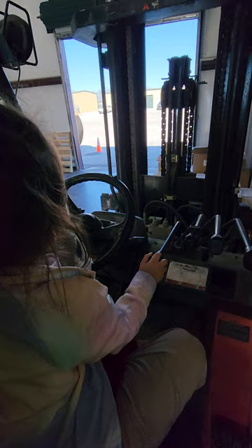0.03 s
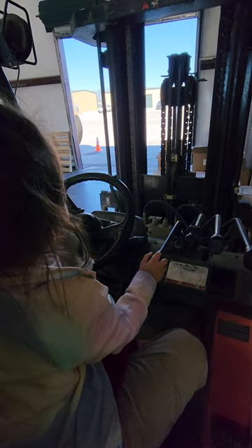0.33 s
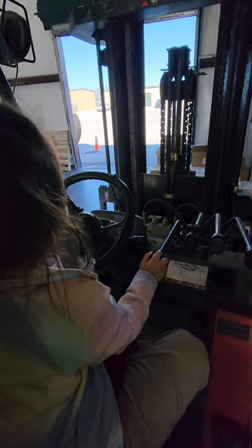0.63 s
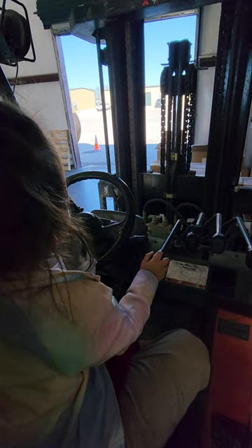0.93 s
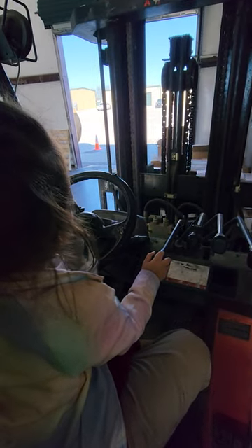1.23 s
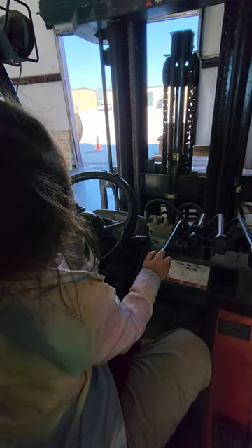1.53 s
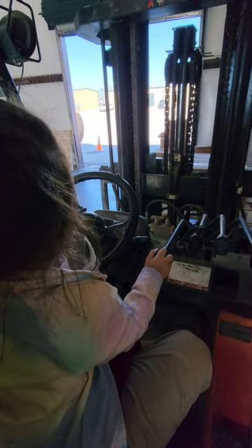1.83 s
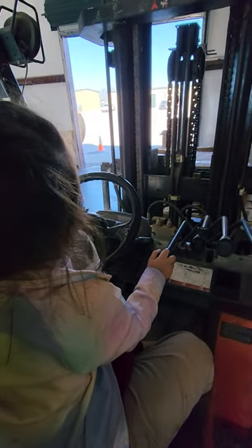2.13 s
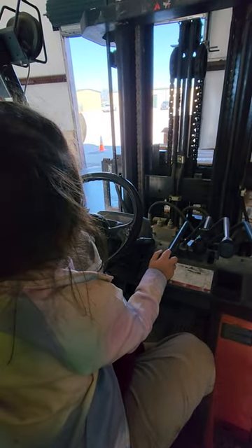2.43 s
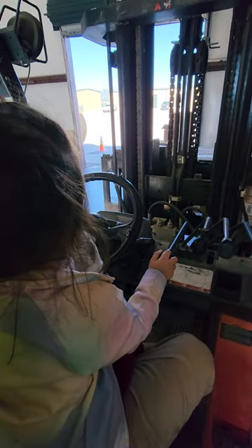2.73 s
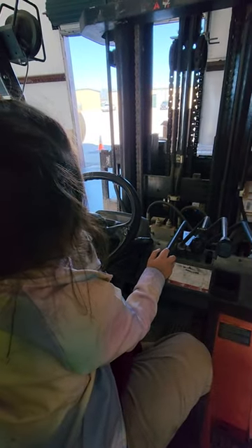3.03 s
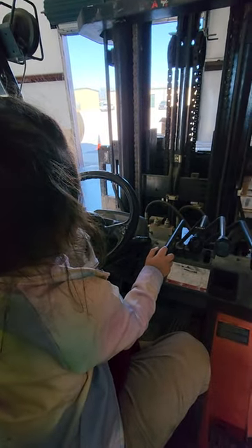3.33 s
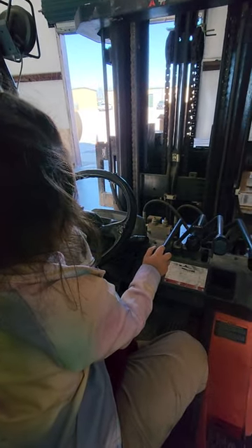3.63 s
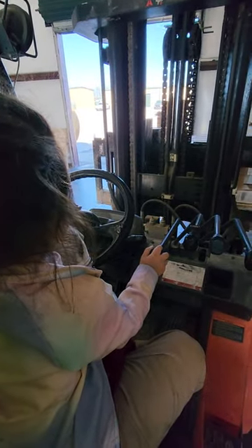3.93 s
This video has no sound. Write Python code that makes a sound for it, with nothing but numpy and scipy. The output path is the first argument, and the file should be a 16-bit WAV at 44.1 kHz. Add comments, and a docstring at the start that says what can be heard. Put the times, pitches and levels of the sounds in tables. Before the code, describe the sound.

Deep, steady forklift engine hum in the cab, with light clatter and soft hydraulic hiss.

```python
"""A deep engine boom with a steady hum on top: a forklift at fast idle, heard from inside the cab.
Four cylinders firing make the boom, and the belt-driven fan makes the hum. The valves clatter,
and hydraulic oil hisses as the mast rises, more brightly near the end. Behind them are a low
rumble, thin whines and two faint ticks. The sound starts thin; its bass comes in at 0.4 s."""
import sys
import numpy as np
from scipy import signal
from scipy.fft import rfft, irfft, next_fast_len
from scipy.io import wavfile
from scipy.ndimage import map_coordinates

SR = 44100
rng = np.random.default_rng(int(sys.argv[2]) if len(sys.argv) > 2 else 0)


def inscribe(sig):
    """Save sig as 16-bit PCM at rate SR to the path in sys.argv[1].

    A 1-D sig is mono; a 2-D sig holds one channel per row.
    Samples are clipped to [-1, 1] before scaling.
    """
    pcm = np.round(np.clip(np.atleast_2d(sig).T, -1, 1) * 32767)
    wavfile.write(sys.argv[1], SR, pcm.astype(np.int16))


N = 176400

# Engine tones: vibrations per engine cycle (two shaft turns), left level/dB, right level/dB
ENGINE_TONES = [(2, -37, -35.5), (4, -21, -21.5), (6, -30.5, -31), (8, -40, -39), (10, -36, -37),
                (11, -36, -33.5), (12, -37, -49), (13, -34, -39.5), (16, -48, -44.5), (20, -49.5, -45),
                (23, -50.5, -47), (24, -50.5, -48.5), (25, -43, -43.5), (29, -46.5, -46.5),
                (31, -44, -50.5)]
def engine(cycles):
    """Four firings a cycle make a firm boom; unequal cylinders add tones that waver more."""
    out, cycle_hz = np.zeros((2, N)), cycles[-1] * SR / N
    for k, left_db, right_db in ENGINE_TONES:
        waver_db = 0.53 if k == 4 else 0.86
        waver = amp(waver_db * wobble(9))
        out += waver * tone(2 * np.pi * k * cycles, k * cycle_hz, left_db, right_db)
    return out


BLADES_PER_CYCLE = 14.856  # fan blades passing in one engine cycle
# How loud the fan's main hum is on the left: t/s, level/dB
FAN_HUM = [(.12, -28), (.25, -26), (.45, -29.5), (.85, -26), (1.15, -23.5), (1.9, -24.5), (2.6, -23),
           (3.7, -23.5), (4, -31)]
# Higher fan tones: multiple of the blade rate, left peak level/dB, right peak level/dB,
# speed above average at which the cab rings most/%, width of that peak/%
FAN_OVERTONES = [(2, -31.5, -34, -0.95, 1.02), (3, -39.5, -54, 0.3, 8.9), (4, -43, -32.5, -0.66, 0.54),
                 (5, -53, -62, -0.3, 2), (6, -49, -42, -0.7, .8), (7, -51, -55.5, 0.2, 2),
                 (8, -55, -50, 0.6, 1.7), (9, -47, -44.5, 0.3, 5.9), (11, -52.5, -69, -0.2, 2.6)]
def fan(cycles, blade_hz):
    """Passing blades hum; each higher tone swells when the speed is right to make the cab ring."""
    mean_hz = blade_hz.mean()
    excess_percent = 100 * (blade_hz / mean_hz - 1)
    shaft_shake = .07 * np.sin(2 * np.pi * 2 * cycles)
    phase = 2 * np.pi * BLADES_PER_CYCLE * cycles + shaft_shake + .025 * wobble(25)
    hum_db = np.interp(seconds(), *np.transpose(FAN_HUM)) + 0.82 * wobble(22.14)
    out = amp(hum_db) * tone(phase, mean_hz, left_db=0, right_db=-3.5)
    for k, left_db, right_db, best, width in FAN_OVERTONES:
        waver = amp((.6 + .13 * k) * wobble(22.006))
        swell = 1 / np.hypot(1, (excess_percent - best) / width)
        out += waver * swell * tone(k * phase, k * mean_hz, left_db, right_db)
    return out


# Tone colour of the clattering engine block: f/Hz, level/dB per Hz
BLOCK_SPECTRUM = [(200, -101), (330, -66), (400, -61.5), (440, -57), (485, -58.5), (560, -70), (650, -71.5),
                  (850, -67), (1000, -65), (1200, -76), (1700, -76.5), (2300, -73), (2900, -79.5),
                  (3500, -84.5), (4400, -85.5), (5500, -92.5), (9000, -105)]
# Where the engine covers ring: f/Hz, width/Hz, level/dB per Hz
COVER_RINGS = [(1464, 44, -68.5), (1696, 45, -71), (1924, 59, -67.5), (2176, 41, -66), (2676, 17, -81),
               (3190, 82, -81), (4080, 76, -78)]
def clatter(cycles, repeat_share=.45):
    """Valve and piston noise, partly the same in every cycle, rings the block and its covers."""
    size = int(N / cycles[-1] / 2)
    one_cycle = irfft(np.exp(2j * np.pi * rng.random((2, size))))
    position = cycles % 1 * one_cycle.shape[1]
    pattern = np.array([map_coordinates(row / row.std(), [position], mode="grid-wrap")
                        for row in one_cycle])
    fresh = rng.standard_normal((2, N))
    rattle = np.sqrt(repeat_share) * pattern + np.sqrt(1 - repeat_share) * fresh
    shaft_knock = 1 + .12 * np.cos(2 * np.pi * 2 * cycles)
    fan_chop = 1 + .17 * np.cos(2 * np.pi * BLADES_PER_CYCLE * cycles)
    rattle *= shaft_knock * fan_chop * amp(.6 * wobble(14))
    covers = lambda hz: sum(amp(db) / (1 + ((hz - f) / width) ** 2) for f, width, db in COVER_RINGS)
    return in_cab(rattle, lambda hz: np.hypot(slopes(BLOCK_SPECTRUM, hz), covers(hz)))


# Oil rushing through the pump and valve: f/Hz, level/dB per Hz
OIL_SPECTRUM = [(1500, -100), (3000, -87), (4200, -83.5), (5100, -88.5), (5900, -89.5), (6500, -86),
                (6950, -88), (7400, -88), (8600, -94), (9900, -103), (10900, -103), (11700, -99.5),
                (12600, -103), (15500, -105)]
# Finer hiss as the mast nears the top: f/Hz, level/dB per Hz
FINE_HISS_SPECTRUM = [(5000, -110), (8000, -94), (10500, -101), (11700, -100), (13000, -95), (14000, -100),
                      (15500, -99)]
def hydraulics(cycles, pulses_per_cycle=12.87, fine_start_s=2.95, fine_rise_s=.2):
    """Oil hiss pulses with the pump; a finer hiss joins late in the lift."""
    ripple = 1 + .11 * np.cos(2 * np.pi * pulses_per_cycle * cycles)
    waver = amp(.5 * wobble(30))
    oil = in_cab(ripple * waver * rng.standard_normal((2, N)), lambda hz: slopes(OIL_SPECTRUM, hz))
    fine = in_cab(rng.standard_normal((2, N)), lambda hz: slopes(FINE_HISS_SPECTRUM, hz))
    return oil + fine * np.clip((seconds() - fine_start_s) / fine_rise_s, 0, 1)


# Low noise of air and panels: f/Hz, level/dB per Hz
RUMBLE_SPECTRUM = [(15, -76), (35, -59), (60, -64), (105, -53), (140, -56), (180, -55.5), (225, -66.5),
                   (270, -57.5), (330, -66.5), (480, -65), (640, -70), (1000, -80), (2000, -113)]
def rumble():
    """Cooling air and shaking panels fill the gaps between the tones."""
    return in_cab(rng.standard_normal((2, N)), lambda hz: slopes(RUMBLE_SPECTRUM, hz))


# Whines of the belt-driven parts: f/Hz at average speed, left level/dB, right level/dB
BELT_WHINES = [(850, -64, -54), (915, -59, -58), (1017, -50.5, -54), (2129, -53, -53.5), (2695, -54.5, -63),
               (2895, -57.5, -68)]
def whines(cycles, waver_db=1.5):
    """Pump and alternator turn with the engine and whine faintly."""
    out, cycle_hz = np.zeros((2, N)), cycles[-1] * SR / N
    for hz, left_db, right_db in BELT_WHINES:
        phase = 2 * np.pi * hz / cycle_hz * cycles
        out += amp(waver_db * wobble(14)) * tone(phase, hz, left_db, right_db)
    return out


# Tiny ticks: t/s, level/dB
HIGH_TICKS = [(1.395, -46), (2.769, -48)]
def ticks(centre_hz=15200, width_hz=1500, decay_s=.004):
    """Faint, very high ticks: bursts of fizz that die away in a few milliseconds."""
    band = lambda hz: 1 / (1 + (2 * (hz - centre_hz) / width_hz) ** 2)
    fizz = filtered(rng.standard_normal((2, N)), band)
    t = seconds()
    bursts = sum(amp(db) * (t >= at) * np.exp(-abs(t - at) / decay_s) for at, db in HIGH_TICKS)
    return fizz / fizz.std() * bursts


def walls(x, count=8, longest_s=.009):
    """Nearby glass and panels add weak, quick echoes of the treble, different on each side."""
    delays = rng.uniform(0.097, 1, (2, count, 1)) * longest_s
    signs = rng.choice([-1, 1], (2, count, 1))
    echoes = lambda hz: (signs * np.exp(-2j * np.pi * hz * delays)).sum(1)
    return filtered(x, lambda hz: 1 + .17 * echoes(hz) * hz / np.hypot(hz, 2500))


# How far a tone's wave on the left runs ahead of the right: f/Hz, lead/radians
LEFT_LEAD = [(30, -.19), (150, -.22), (205, -.9), (242, .2), (330, -.1), (400, -.7), (484, .3), (727, -.6),
             (970, 2.4), (1210, .6), (1455, 2.1), (1700, 2), (1940, -.6), (2180, .6)]
def tone(phase, hz, left_db, right_db):
    """One pure tone as it arrives on the left and on the right."""
    lead = along(LEFT_LEAD, hz) * np.array([[.5], [-.5]])
    return np.sqrt(2) * amp([[left_db], [right_db]]) * np.sin(phase + lead + rng.uniform(0, 2 * np.pi))


# How alike the noise is on both sides: f/Hz, likeness (1 or more = the same, -1 = opposite)
SIDE_LIKENESS = [(60, 5.5), (160, 0.3), (300, 0.87), (500, 0.1), (800, -0.5), (1300, -0.25), (2100, 0.1),
                 (4000, 0), (12000, 0)]
# How much louder the noise is on the left: f/Hz, left minus right level/dB
SIDE_BALANCE = [(100, .5), (270, 2), (500, -1), (1200, -2), (2100, 1), (4200, -2), (8000, -.5), (13000, 3)]
def in_cab(pair, gain):
    """Give two white noises the tone colour gain(hz) and spread them between left and right."""
    def blend(hz):
        angle = np.arccos(np.clip(along(SIDE_LIKENESS, hz), -1, 1)) / 2
        return np.sqrt(SR / 2) * gain(hz) * np.array([np.cos(angle), np.sin(angle)])
    mid, side = filtered(pair, blend)
    balance = lambda hz: amp(np.outer([.5, -.5], along(SIDE_BALANCE, hz)))
    return filtered(np.array([mid + side, mid - side]), balance)


def amp(db):
    """Turn decibels into a gain."""
    return 10 ** (np.asarray(db) / 20)


def seconds():
    """The time of every sample."""
    return np.arange(N) / SR


def along(points, hz):
    """Read between the rows of an (f/Hz, value) table, on a log frequency scale."""
    f, values = np.transpose(points)
    return np.interp(np.log(hz + 1), np.log(f + 1), values)


def wobble(rate):
    """A smooth curve through `rate` random values a second."""
    return map_coordinates(rng.standard_normal(int(N * rate / SR) + 4), [seconds() * rate])


def filtered(x, response):
    """Scale each frequency in x by response(hz)."""
    size = next_fast_len(N + SR // 2)
    return irfft(rfft(x, size) * response(np.fft.rfftfreq(size, 1 / SR)), size)[..., :N]


def slopes(points, hz):
    """Gain from an (f/Hz, level/dB) table, fading away beyond its ends."""
    low_fade = np.minimum(1, hz / points[0][0]) ** 2
    high_fade = 1 / np.maximum(1, hz / points[-1][0]) ** 2
    return amp(along(points, hz)) * low_fade * high_fade


# How fast the fan blades pass, rising and falling with the engine: t/s, f/Hz
BLADE_RATE = [(.12, 243), (.29, 242.4), (.38, 237.8), (.55, 239.8), (.7, 241), (.84, 240.5), (1.18, 243.9),
              (1.32, 242.8), (1.46, 244.7), (1.66, 241.2), (1.8, 243.1), (1.98, 240.9), (2.3, 242.4),
              (2.42, 241.7), (2.56, 242.9), (2.86, 243), (2.98, 242.2), (3.12, 244.4), (3.4, 244.1),
              (3.66, 242.6), (3.93, 238.3)]
def scene():
    """One speed drives engine, fan and pump."""
    blade_hz = np.interp(seconds(), *np.transpose(BLADE_RATE))
    cycles = np.cumsum(blade_hz) / BLADES_PER_CYCLE / SR  # engine cycles so far
    tones = engine(cycles) + fan(cycles, blade_hz) + whines(cycles)
    return tones + rumble() + walls(clatter(cycles) + hydraulics(cycles)) + ticks()


def record(dry):
    """After a brief silence the sound starts thin, then gains its bass; the highest treble is cut."""
    start_s, bass_in_s, bass_cut_hz, top_hz = 0.1137, .4, 112, 15720
    t = seconds()
    thin = signal.sosfilt(signal.butter(2, bass_cut_hz, "high", fs=SR, output="sos"), dry)
    bass_in = np.clip((t - bass_in_s) / .01 + .5, 0, 1)
    fade_in = np.clip((t - start_s) / 0.0036, 0, 1)
    return filtered(fade_in * (thin + bass_in * (dry - thin)), lambda hz: hz < top_hz)


dry = scene()
out = record(dry)
inscribe(out)
```